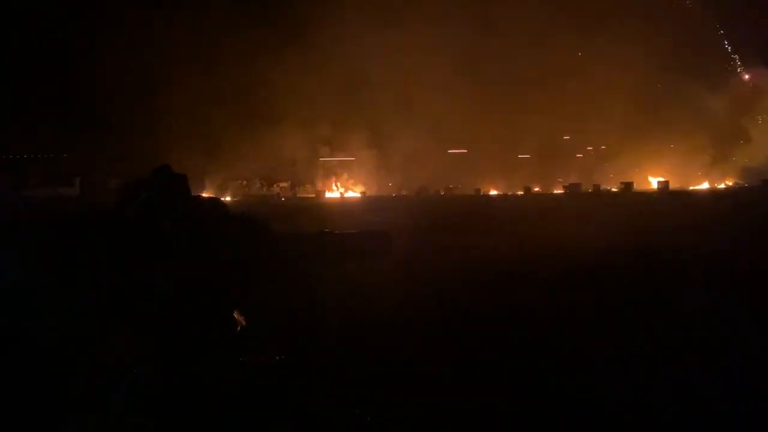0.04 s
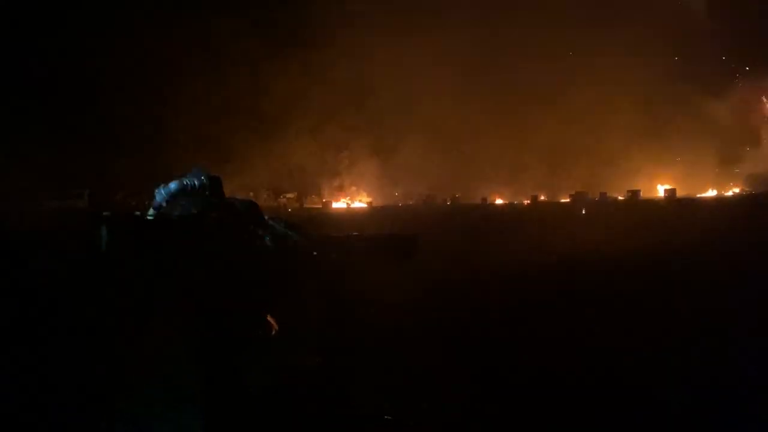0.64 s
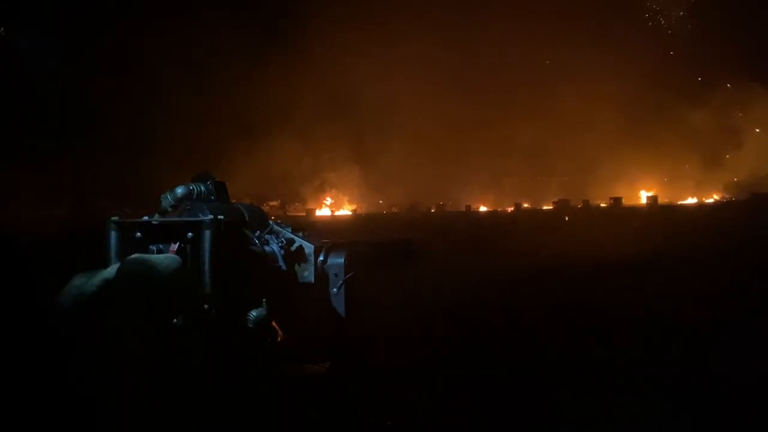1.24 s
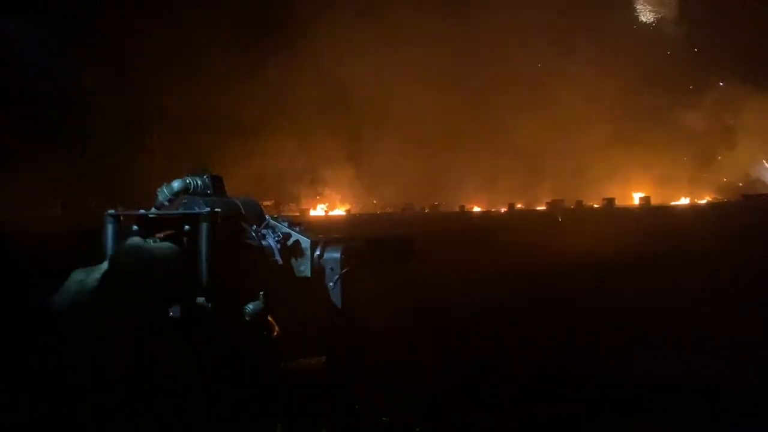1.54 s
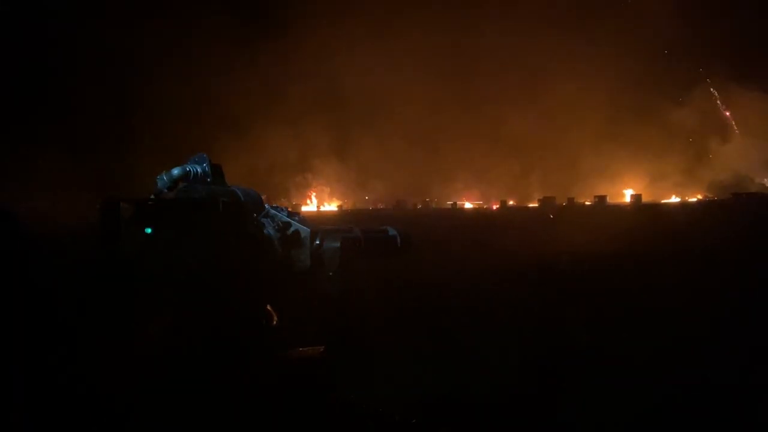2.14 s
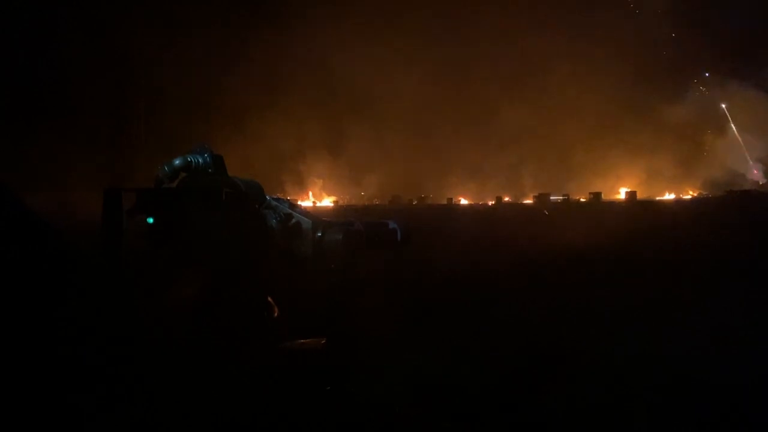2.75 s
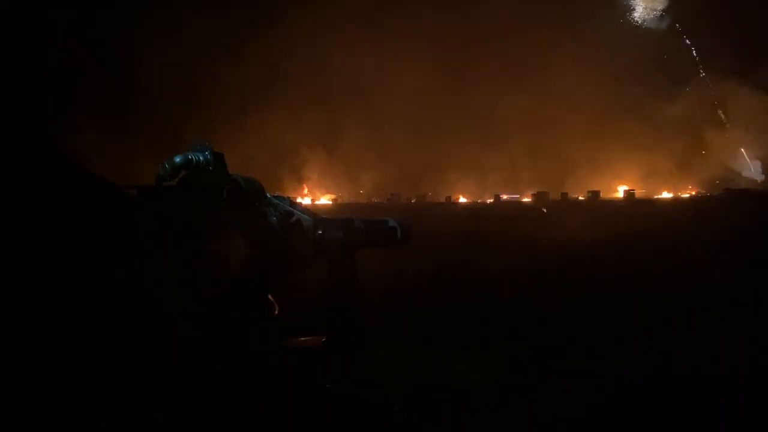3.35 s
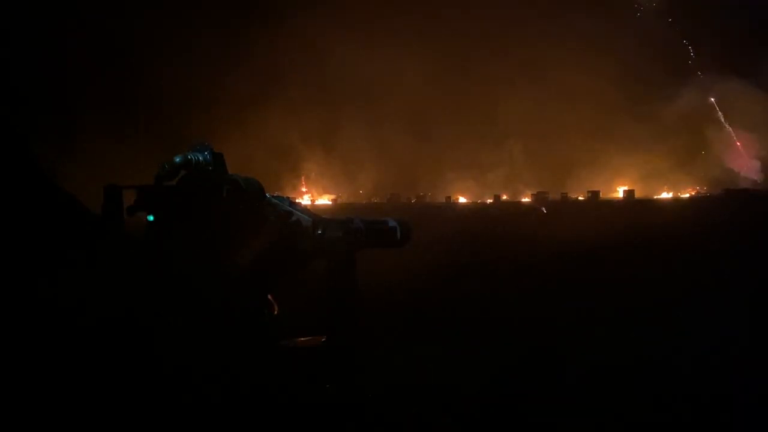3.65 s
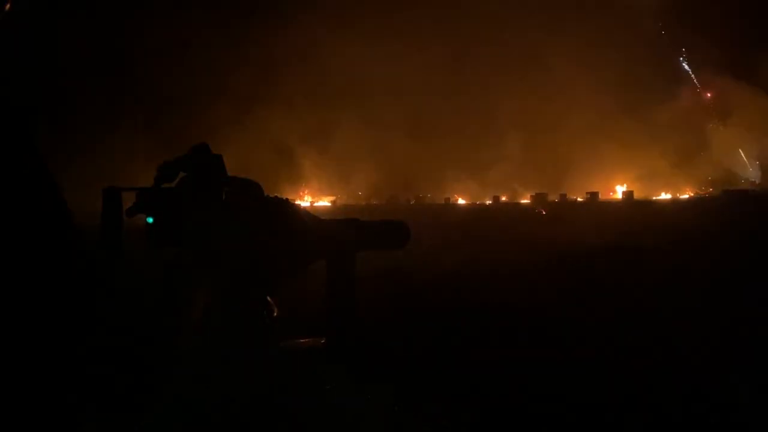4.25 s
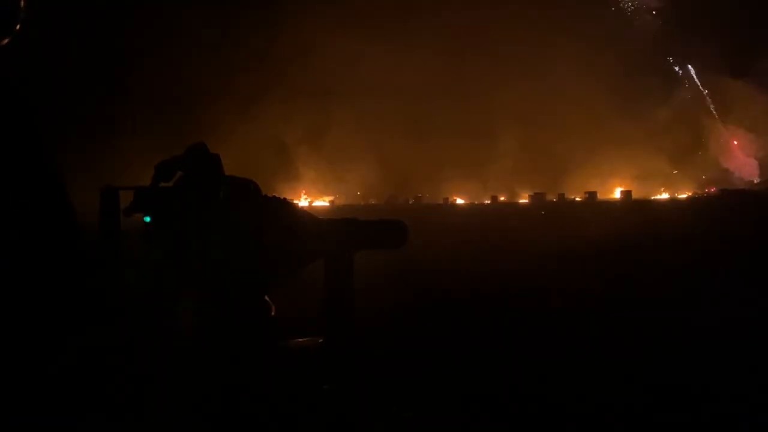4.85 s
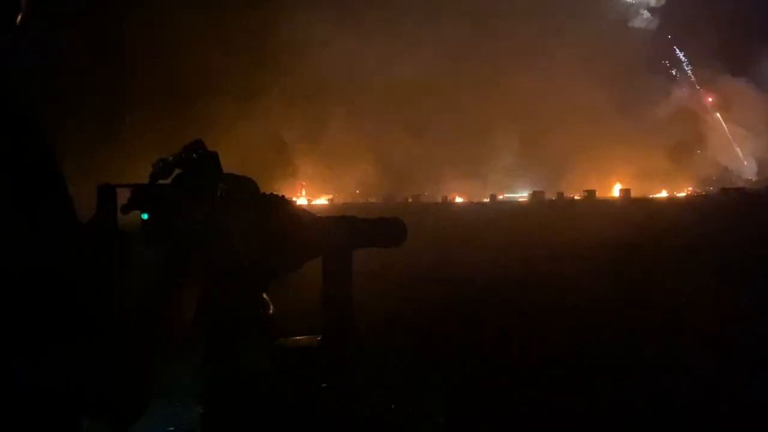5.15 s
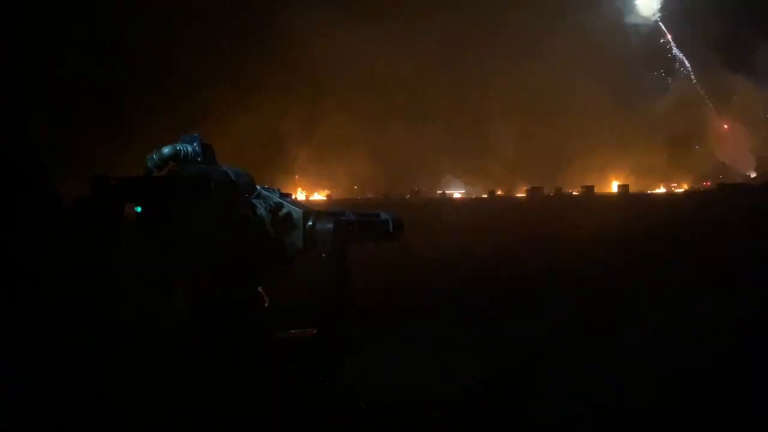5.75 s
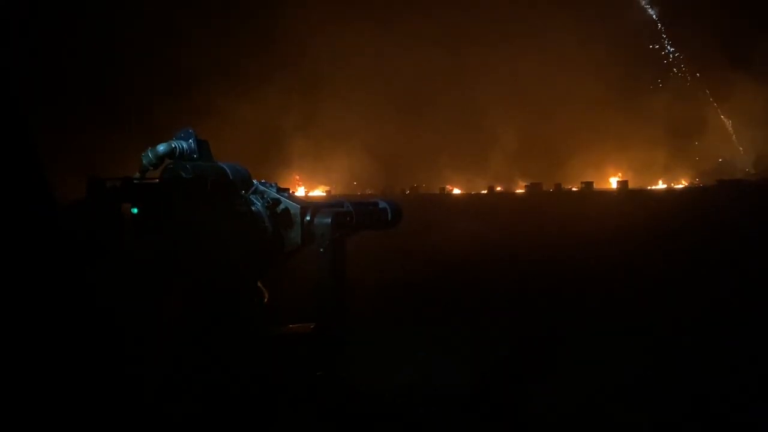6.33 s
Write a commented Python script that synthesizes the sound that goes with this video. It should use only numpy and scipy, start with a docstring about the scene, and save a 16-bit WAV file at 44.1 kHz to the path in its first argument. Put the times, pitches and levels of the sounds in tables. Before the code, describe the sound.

Distant gunfire rumbles across an open field as deep paired thumps and scattered dry rifle cracks sound along a firing line. Two brief, rapid machine gun bursts come from the left, dull and slightly metallic. After a short gap, a close machine gun hammers steadily to the end, its metal ringing and its echoes building. The loudest shots sound compressed on the small stereo microphone.

```python
"""An open range at night: a machine gun on the left fires two fast bursts, then a close gun one long one.
Heavy guns thump and rifles crack down the line; the field rolls with echoes over a distant roar.
Each report is a pressure pulse that sweeps downward, bass last, followed by a noisy tail.
The fast and close guns add ringing metal and nearby reflections. A small stereo recorder squashes peaks."""
import sys
import numpy as np
from scipy import signal
from scipy.fft import rfft, irfft, next_fast_len
from scipy.io import wavfile
from scipy.ndimage import map_coordinates

SR = 44100
rng = np.random.default_rng(int(sys.argv[2]) if len(sys.argv) > 2 else 0)


def write(x):
    x = np.atleast_2d(x).T
    wavfile.write(sys.argv[1], SR, np.round(np.clip(x, -1, 1) * 32767).astype(np.int16))


N = 281799
FFT_SIZE = next_fast_len(N + SR)
HZ = np.fft.rfftfreq(FFT_SIZE, 1 / SR)
TIME_S, AGE_S = np.arange(N) / SR, np.arange(SR) / SR  # scene clock, impulse-response clock


def amp(db):
    """Decibels to gain. All table levels are relative."""
    return 10 ** (np.asarray(db) / 20)


def unit_rms(x):
    """Scale to rms 1."""
    return x / np.sqrt(np.mean(x ** 2) + 1e-20)


def curve(points):
    """Interpolate (Hz, value) points on a log frequency axis."""
    hz, values = np.transpose(points)
    return np.interp(np.log(HZ + 1), np.log(hz + 1), values)


def filtered(x, response):
    """Apply a frequency response."""
    return irfft(rfft(x, FFT_SIZE) * response, FFT_SIZE)[..., :N]


def pulse(spectrum):
    """Response of the sharpest causal pulse with this spectrum (minimum phase)."""
    cepstrum = irfft(np.log(amp(curve(spectrum))), FFT_SIZE)
    cepstrum[1:FFT_SIZE // 2] *= 2
    cepstrum[FFT_SIZE // 2 + 1:] = 0
    return np.exp(rfft(cepstrum))


def sweep(lag_s, knee_hz):
    """All-pass that delays the bass below the knee by up to lag_s."""
    return np.exp(-2j * np.pi * lag_s * knee_hz * np.arctan(HZ / knee_hz))


def delay(lag_s):
    """Response of a pure delay."""
    return np.exp(-2j * np.pi * HZ * lag_s)


def ground_bounce(lag_s, db):
    """Direct sound plus one reflection."""
    return 1 + amp(db) * delay(lag_s)


def envelope(t60_s, rise_s):
    """Swell and decay of energy 1."""
    shape = amp(-60 * AGE_S / t60_s) * (1 - np.exp(-AGE_S / rise_s))
    return shape / np.linalg.norm(shape)


def tails(shots, carrier, t60_s, rise_s):
    """Each round leaves a fresh noisy tail; the tails add in power."""
    power = signal.fftconvolve(shots ** 2, envelope(t60_s, rise_s) ** 2)[:N]
    return carrier * np.sqrt(np.abs(power))


def scatter(spectrum, t60_s, spikiness, likeness):
    """Dense small shock fronts off nearby things, the same for every round of a standing gun."""
    mid, side = rng.standard_normal((2, SR)) * np.exp(spikiness * rng.standard_normal(SR))
    side = side * (1 - likeness)
    fronts = envelope(t60_s, rise_s=0.0006) * np.array([mid + side, mid - side])
    fronts /= np.linalg.norm(fronts, axis=1, keepdims=True)
    bass_loss = (1j * HZ / (1j * HZ + 650)) ** 2  # long waves bend round small things
    return rfft(fronts, FFT_SIZE) * pulse(spectrum) * bass_loss


def ringing(modes, spread_rad):
    """Response of damped modes that reach the two microphones in different phase."""
    phases = rng.normal(0, spread_rad, (len(modes), 1, 1)) * [[1], [-1]]
    ring = sum((-1) ** k * amp(db - 60 * AGE_S / t60_s) * np.sin(2 * np.pi * hz * AGE_S + phases[k])
               for k, (hz, db, t60_s) in enumerate(modes))
    attack = 1 - np.exp(-AGE_S / 0.00056)
    return rfft(ring * attack, FFT_SIZE)


def triggers(times_s, db):
    """One impulse per round."""
    samples = np.round(times_s * SR).astype(int)
    return np.bincount(samples, amp(db) * np.ones(len(samples)), N)[:N]


def burst_shots(bursts, db, jitter_db):
    """Impulses of a gun that cycles evenly while the trigger is held."""
    times_s = np.concatenate([start + cycle * np.arange(rounds) for start, cycle, rounds in bursts])
    return triggers(times_s, rng.normal(db, jitter_db, len(times_s)))


def stray_shots(count, spread_db):
    """Impulses strewn over the scene, up to spread_db below full strength."""
    offset, weakness = rng.random(size=(count, 2)).T
    return triggers((np.arange(count) + offset) / count * N / SR, -spread_db * weakness)


# Diffuse sound at the two microphones: (frequency [Hz], correlation [0-1])
STEREO_LIKENESS = [(80, .97), (250, 0.73), (600, 0.088), (1500, 0.016), (5000, 0.087)]
def noise(spectrum):
    """Stereo noise, alike in the bass."""
    angle = np.arccos(curve(STEREO_LIKENESS)) / 2
    response = amp(curve(spectrum)) * [np.cos(angle), np.sin(angle)]
    mid, side = filtered(rng.standard_normal((2, N)), response)
    return np.array([mid + side, mid - side])


# Shadowing of a source on the left: (frequency [Hz], left minus right [dB])
LEFT_SHADOW = [(100, .4), (250, 2), (600, 5.5), (950, 5), (1400, -1), (3000, 1.5), (8000, 0)]
def from_left(lead_s):
    """The left microphone hears it earlier and, in most bands, louder."""
    return np.array([amp(half * curve(LEFT_SHADOW)) * delay(-half * lead_s) for half in (0.5, -0.5)])


# Distant firing, low and high bands: (frequency [Hz], density [dB])
RUMBLE_SPECTRUM = [(15, -62), (30, -35), (60, 1.5), (120, -1), (250, -5.5), (420, -10), (700, -9),
                   (1100, -27.5), (2500, -54.5)]
HISS_SPECTRUM = [(300, -19), (1000, 7), (1600, 4.5), (2400, 4.5), (3600, 1.5), (5000, -6), (8000, -10.5),
                 (12000, -23), (16000, -29)]
def distant_roar():
    """Far guns pop at random; their echoes merge into uneven rumble and hiss."""
    flutter = map_coordinates(rng.standard_normal(N // 100), [TIME_S * 45])  # 45 points/s
    shots = stray_shots(count=260, spread_db=12.5)
    pops = unit_rms(filtered(shots, pulse(RUMBLE_SPECTRUM) * from_left(lead_s=0.00033)))
    rumble = amp(-3.5 + 2 * flutter) * unit_rms(noise(RUMBLE_SPECTRUM))
    hiss = amp(-39 + 2.1 * flutter) * unit_rms(noise(HISS_SPECTRUM))
    return amp(-26.5) * (amp(-8) * pops + rumble) + hiss


def far_echo(shots, t60_s=0.88):
    """The far end answers late, building in a burst and sinking in pauses; earlier firing dies away."""
    answer = amp(3.5) * unit_rms(noise(RUMBLE_SPECTRUM)) + amp(0.7) * unit_rms(noise(HISS_SPECTRUM))
    field = amp(8) * unit_rms(noise(FIELD_SPECTRUM))
    lingering = amp(-35.5 - 60 * TIME_S / t60_s) * (answer + field)
    return lingering + tails(shots, answer, t60_s, rise_s=0.19)


# Echo of the field: (frequency [Hz], density [dB])
FIELD_SPECTRUM = [(20, -42), (55, -6), (120, -4), (300, -6), (650, -10), (1200, -18.5), (2400, -17),
                  (4000, -23.5), (8000, -30.5), (16000, -40)]
def field_echo(shots):
    """The field answers each round at once with a dark roll."""
    return amp(8.5) * tails(shots, unit_rms(noise(FIELD_SPECTRUM)), t60_s=0.56, rise_s=0.0061)


# Single rifle shots: (time [s], level [dB])
RIFLE_SHOTS = [(0.809, -14), (0.877, -16.5), (1.182, -12.5), (1.381, -11.5), (1.883, -13), (2.178, -11),
               (2.693, -13), (3.451, -11), (3.661, -10.5), (4.491, -14), (4.854, -9), (4.91, -12),
               (5.072, -9.5), (5.553, -10.5), (5.779, -10)]
# Rifle pressure pulse: (frequency [Hz], level [dB])
RIFLE_PULSE = [(60, 9), (250, 23), (450, 24), (700, 31.5), (1100, 20.5), (1500, 20), (2200, 16.5),
               (5000, -1.5), (16000, -5.5)]
def rifles(faint_per_s=3):
    """Dry cracks down the line, doubled by the ground, each followed by its thump."""
    faint = stray_shots(count=round(faint_per_s * N / SR), spread_db=16)
    shots = triggers(*np.transpose(RIFLE_SHOTS)) + amp(-19) * faint
    crack = pulse(RIFLE_PULSE) * sweep(lag_s=0.00504, knee_hz=298) * ground_bounce(lag_s=0.001404, db=-5)
    thump = amp(2.5) * pulse(HEAVY_PULSE) * sweep(lag_s=0.01186, knee_hz=212)
    tail = amp(1.5) * tails(shots, noise(LINE_SCATTER), t60_s=0.035, rise_s=0.0003)
    return filtered(shots, crack + thump) + tail


# Heavy gun, two rounds at a time: (time [s], gap [s], level [dB])
HEAVY_DOUBLES = [(0.4507, 0.11, -2.5), (0.9803, 0.11, -0.5), (2.1134, 0.1138, -0.1), (2.7844, 0.1137, 1.5),
                 (3.3879, 0.12, -1), (3.974, 0.13, 0), (4.6061, 0.1105, -0.2), (5.208, 0.11, 1),
                 (5.8126, 0.1124, -1)]
# Slow guns far down the line: (start [s], cycle [s], rounds [count])
SLOW_FIRE = [(0.684, 0.1284, 3), (1.608, 0.1297, 9), (4.2905, 0.1252, 15)]
def heavy_shots():
    """Impulses of the heavy gun's pairs and the slow guns' weaker bursts."""
    first_s, gap_s, db = np.transpose(HEAVY_DOUBLES)
    pairs = triggers(first_s, db) + triggers(first_s + gap_s, db)
    return pairs + burst_shots(SLOW_FIRE, db=-7.5, jitter_db=0.7)


# Deep pressure pulse, also the rifles' thump: (frequency [Hz], level [dB])
HEAVY_PULSE = [(15, -14), (35, -3), (65, 32), (115, 42.5), (190, 36), (240, 35), (370, 21), (560, 22.5),
               (1000, 13.5), (2200, 2.5), (5000, -9), (16000, -42)]
def heavy_guns(shots):
    """Deep thumps from the left that have lost their treble on the way."""
    blast = pulse(HEAVY_PULSE) * sweep(lag_s=0.00793, knee_hz=227) * from_left(lead_s=0.0004)
    tail = amp(-13.5) * tails(shots, noise(LINE_SCATTER), t60_s=0.093, rise_s=0.0018)
    return filtered(shots, blast) + tail


# Fast gun's bursts: (start [s], cycle [s], rounds [count])
FAST_FIRE = [(0.0537, 0.071, 8), (1.0752, 0.0705, 6)]
def fast_shots():
    """Impulses of the fast gun, slightly uneven in strength."""
    return burst_shots(FAST_FIRE, db=0, jitter_db=0.49)


# Fast gun's pressure pulse: (frequency [Hz], level [dB])
FAST_PULSE = [(15, -14), (30, 20), (62, 34.5), (135, 39), (200, 31), (290, 28), (400, 31.5), (600, 36.5),
              (820, 28), (1200, 15.5), (2200, 3), (5000, -3), (16000, -18)]
# Scatter off benches and mounts, also in rifle and heavy tails: (frequency [Hz], level [dB])
LINE_SCATTER = [(100, -7), (400, 36.5), (900, 25.5), (1300, 13.5), (2300, 15.5), (3200, 8), (5000, 0.5),
                (9000, -2), (16000, -21)]
# Receiver modes: (frequency [Hz], level [dB], t60 [s])
RECEIVER_MODES = [(1005, -17.5, 0.03), (2080, -24, 0.065), (2370, -32.5, 0.089), (4390, -35, 0.077)]
def fast_gun(shots):
    """Dull blast from the left with a metallic ring, reflections and a short, thin tail."""
    blast = pulse(FAST_PULSE) * sweep(lag_s=0.01139, knee_hz=268.4) * from_left(lead_s=0.00041)
    reflections = amp(-9) * scatter(LINE_SCATTER, t60_s=0.052, spikiness=0.47, likeness=0.15)
    ring = ringing(RECEIVER_MODES, spread_rad=0.3)
    thin_noise = filtered(noise(LINE_SCATTER), HZ ** 2 / (HZ ** 2 + 600 ** 2))
    tail = amp(-1) * tails(shots, thin_noise, t60_s=0.2, rise_s=0.0008)
    return filtered(shots, blast + ring + reflections) + tail


def close_shots(start_s=2.7097, rounds=35):
    """Impulses of the close gun: the first cycle pulls the belt taut; the action speeds up as it warms."""
    belt_slack_s, warm_cycle_s, cold_extra_s, warming_rounds = 0.006, 0.10649, 0.0036, 12
    coldness = np.exp(-(np.arange(rounds - 1) / warming_rounds) ** 2)
    cycles_s = warm_cycle_s + cold_extra_s * coldness
    times_s = start_s + np.append(0, belt_slack_s + np.cumsum(cycles_s))
    return triggers(times_s, db=rng.normal(0, 0.69, rounds))


# Close gun's pressure pulse: (frequency [Hz], level [dB])
CLOSE_PULSE = [(15, -12), (30, 9), (60, 37), (100, 38.5), (150, 35.5), (195, 19), (260, 35), (340, 26.5),
               (460, 26.5), (600, 32.5), (1000, 10.5), (2200, 7.5), (5000, 7), (16000, -14)]
# Its scatter off benches and mounts: (frequency [Hz], level [dB])
NEAR_SCATTER = [(100, 23), (400, 27), (750, 26.5), (1250, 12.5), (1600, 23.5), (1900, 17), (2400, 23.5),
                (3000, 14.5), (5000, 10), (7500, 7.5), (10000, 5.5), (16000, 0.5)]
# Modes of gun and stand: (frequency [Hz], level [dB], t60 [s])
STAND_MODES = [(566, -11.5, 0.068), (738, -11.5, 0.04), (768, -15.5, 0.078), (876, -32.5, 0.066),
               (1106, -17, 0.11), (1525, -55, 0.1), (1512, -7.5, 0.016), (2090, -21, 0.11),
               (2290, -20, 0.04), (2345, -19.5, 0.076), (2740, -43, 0.037), (3100, -58, 0.017),
               (3420, -19, 0.053), (3600, -38, 0.075), (4400, -43, 0.031), (4800, -28, 0.097)]
def close_gun(shots):
    """Muzzle blast with ground bounce, ringing stand, reflections and a crackling puff of turbulent gas."""
    blast = pulse(CLOSE_PULSE) * sweep(lag_s=0.012414, knee_hz=286.2)
    blast *= ground_bounce(lag_s=0.0056, db=-9.5)
    ring = amp(0.5) * ringing(STAND_MODES, spread_rad=0.74)
    pan = amp([[0.7], [-0.7]])
    body = (blast + ring) * delay(lag_s=0.000769) * pan  # follows the first crack
    reflections = amp(1.5) * scatter(NEAR_SCATTER, t60_s=0.063, spikiness=0.14, likeness=0.27)
    turbulence = map_coordinates(rng.standard_normal(N // 10), [TIME_S * 2500], order=1)
    crackle = unit_rms(np.exp(0.6 * turbulence))
    gas = amp(-2.5) * tails(shots, noise(NEAR_SCATTER) * crackle, t60_s=0.1, rise_s=0.0014)
    return filtered(shots, body + reflections) + gas


def scene():
    """All guns over the roar; the close, fast and heavy rounds drive both echoes."""
    close, fast, heavy = close_shots(), fast_shots(), heavy_shots()
    field = field_echo(close + amp(-5.5) * fast + amp(-14) * heavy)
    far = far_echo(close + amp(-1.5) * fast + amp(-2.5) * heavy)
    guns = close_gun(close) + fast_gun(fast) + heavy_guns(heavy) + rifles()
    return distant_roar() + far + field + guns


def record(dry):
    """Small recorder: squashed peaks, shared treble, port resonances turning the right channel's phase."""
    ceiling, low_cut_hz, mono_above_hz, top_hz = 1.14, 24, 6300, 16100
    left, right = dry / (1 + np.abs(dry / ceiling) ** 4) ** (1 / 4)
    width = 1 / (1 + (HZ / mono_above_hz) ** 8)
    mid = filtered(left + right, np.sqrt(2 - width ** 2) / 2)
    side = filtered(left - right, width / 2)
    poles = [hz ** 2 - HZ ** 2 + 1j * HZ * width_hz for hz, width_hz in [(9100, 2300), (13200, 1700)]]
    ports = np.prod([np.conj(pole) / pole for pole in poles], axis=0)
    passband = HZ ** 4 / (HZ ** 4 + low_cut_hz ** 4) * (HZ < top_hz)
    return filtered(np.array([mid + side, filtered(mid - side, ports)]), passband)


dry = scene()
out = record(dry)
write(out)
```